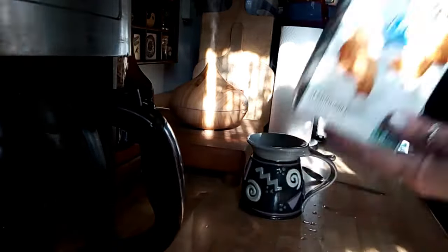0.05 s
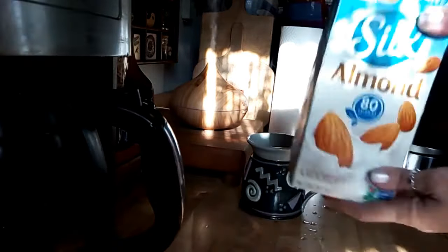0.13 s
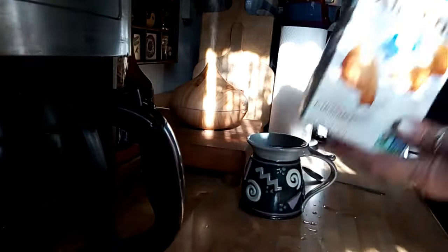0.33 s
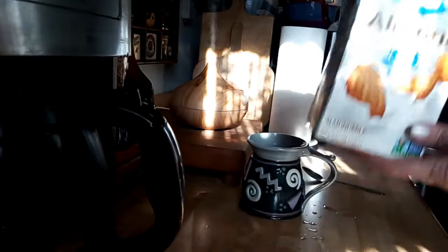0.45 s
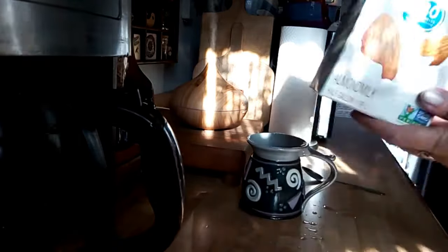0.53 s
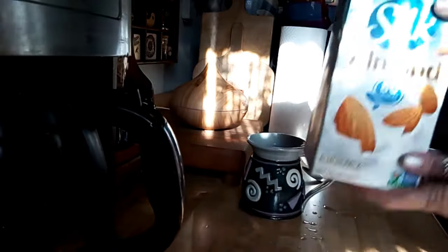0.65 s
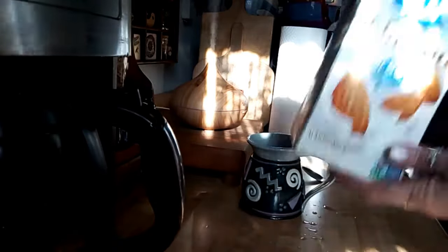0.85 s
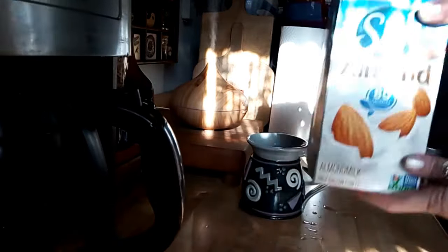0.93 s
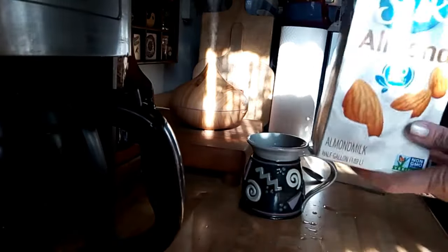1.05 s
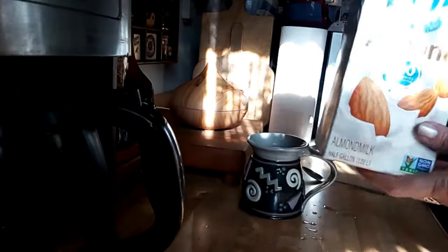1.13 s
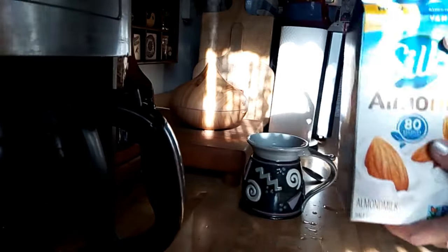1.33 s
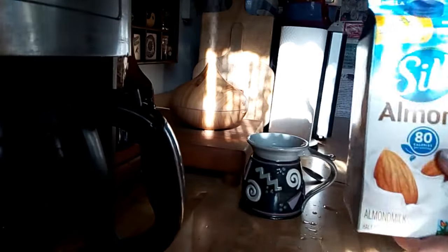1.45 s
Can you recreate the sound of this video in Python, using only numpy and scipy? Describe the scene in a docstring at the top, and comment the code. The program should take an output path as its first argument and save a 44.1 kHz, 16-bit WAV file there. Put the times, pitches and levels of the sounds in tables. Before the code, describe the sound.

A carton of milk is shaken close to the microphone: quick wet sloshes, fizzy splashes and hollow cardboard thumps for about a second, then weaker slops settling over a faint appliance hum in a quiet kitchen.

```python
"""A carton of milk is shaken by hand over a counter in a small, quiet kitchen.
First come an appliance hum (two sines) over soft coloured noise and a few drops (noise bursts).
Then the shaking: bulk milk churns and spray fizzes (banks of click-driven ringing bubbles), sounding
through the hollow carton; its walls thump and the box bulges (low damped sines).
A little later air pockets ring (damped, rising sines); at the end the milk settles over the hum."""
import sys
import numpy as np
from scipy import signal
from scipy.fft import rfft, irfft, next_fast_len
from scipy.io import wavfile

SR = 44100
rng = np.random.default_rng(int(sys.argv[2]) if len(sys.argv) > 2 else 0)


def master(y):
    """Save y as 16-bit WAV."""
    cut = np.clip(np.atleast_2d(y).T, -1, 1)
    pcm = np.round(cut * 32767)  # scale
    wavfile.write(sys.argv[1], SR, pcm.astype(np.int16))


N = 66150
TIME = np.arange(N) / SR

# appliance hum: f/Hz, rms level/dB
HUM_TONES = [(58.5, -66.5), (117, -67)]
# colour of the quiet room: f/Hz, relative level/dB
ROOM_COLOUR = [(20, -8), (40, -48), (70, -3.5), (130, -23), (175, -8.5), (290, -5), (450, -8.5),
               (700, -15.5), (1500, -23.5), (3500, -28.5), (6500, -23.5), (10000, -44.5), (13500, -43.5),
               (15300, -32.5)]
# single drops smack the cardboard: t/s, level/dB
DROP_SMACKS = [(0.036, -72), (0.048, -58), (0.1561, -50), (0.371, -37), (0.402, -41), (0.513, -35),
               (0.6332, -35), (0.871, -34), (0.898, -30.5), (0.909, -32), (1.04, -41.5), (1.208, -47.5),
               (1.324, -48.5)]
# resonances of the hollow carton: f/Hz, gain/dB
CARTON_RESONANCES = [(292, -1.5), (392, -2), (587, -7.5), (724, -13), (920, -2.5), (1308, -4), (1483, -3),
                     (1552, -2), (1812, -13), (2016, -12), (2134, -13), (2244, 1), (2357, -10)]
# the bulk of the milk rolls over: crest t/s, rise/s, level/dB, fall/(dB/s)
MILK_SURGES = [(0.233, 0.021, -39, 434), (0.336, 0.077, -47, 305), (0.377, 0.0096, -35, 250),
               (0.436, 0.062, -38, 435), (0.515, 0.029, -31.5, 320), (0.567, 0.06, -37, 171),
               (0.678, 0.06, -38, 247), (0.748, 0.049, -37, 200), (0.797, 0.064, -36.5, 315),
               (0.895, 0.026, -37.5, 335), (0.978, 0.075, -39.5, 191), (1.032, 0.042, -36, 202),
               (1.162, 0.0084, -49, 236.5), (1.238, 0.03, -48, 206), (1.257, 0.018, -50, 286),
               (1.325, 0.033, -76, 130)]
# colour of the churning: f/Hz, relative level/dB
CHURN_COLOUR = [(30, -41), (70, -38), (120, -1), (175, -17), (260, 0), (350, -2), (520, -10.5), (740, -8.5),
                (1020, -12.5), (1480, -10.5), (2200, -13.5), (4000, -22.5), (6500, -23.5), (11000, -66),
                (15500, -72)]
# milk slaps a wall and sprays: start t/s, rise/s, level/dB, fall/(dB/s)
WALL_SPLASHES = [(0.215, 0.0083, -39, 539), (0.284, 0.013, -53, 160), (0.369, 0.0087, -34.5, 397),
                 (0.392, 0.01, -33.5, 190), (0.468, 0.017, -34.5, 147), (0.629, 0.0044, -38.5, 302),
                 (0.639, 0.0038, -41, 124), (0.719, 0.018, -47, 45), (0.863, 0.0035, -45.5, 154),
                 (0.881, 0.0037, -33.5, 299), (0.903, 0.0017, -31.5, 490), (0.96, 0.045, -47, 113),
                 (1.208, .005, -53.5, 111), (1.299, 0.0083, -54.5, 193)]
# colour of the spray and drops: f/Hz, relative level/dB
SPRAY_COLOUR = [(100, -28), (300, -12), (550, -5.5), (1000, -3.5), (2200, -2), (2900, -3), (3500, -1),
                (4300, -6.5), (5300, -3.5), (6800, -1), (8000, -10.5), (10500, -26.5), (13400, -36),
                (15300, -20.5)]
# a wall of the carton takes the weight: t/s, f/Hz, peak level/dB
WALL_THUMPS = [(0.2203, 333, -30.5), (0.373, 310, -47), (0.4307, 283, -32), (0.442, 287.5, -26.5),
               (0.471, 300, -37), (0.477, 306, -26), (0.517, 297, -26), (0.53, 320, -37),
               (0.721, 333, -32.5), (0.780, 294, -38), (0.794, 295, -27), (0.8943, 276, -29),
               (0.9019, 275, -35), (1.004, 356, -28.5), (1.018, 245, -33.5), (1.240, 367, -39.5),
               (1.285, 250, -42.5), (1.325, 403, -42)]
# the whole carton bulges: t/s, peak level/dB
CARTON_BULGES = [(0.222, -44), (0.42, -44), (0.478, -35.5), (1.024, -41)]
# single air pockets ring: t/s, starting f/Hz, peak level/dB, t60/s
AIR_POCKETS = [(0.3217, 5080, -40, .015), (0.351, 3980, -50, 0.018), (0.3798, 2064, -19, 0.0089),
               (0.386, 2240, -31, .06), (0.388, 1870, -31, .05), (0.511, 752, -26.5, 0.02),
               (0.513, 1500, -41, 0.022), (0.563, 1380, -32.5, .03), (0.8875, 2170, -27.5, .025),
               (0.892, 1560, -26.5, 0.012)]

ROOM_TONE_DB = -57
DROP_RISE_S, DROP_FALL_DB_PER_S = 0.00045, 1200
CARTON_WIDTH_HZ = 7.3  # bandwidth of each resonance
KITCHEN_T60_S, KITCHEN_DB = 0.23, -12.5
# bubbles ring down by 60 dB in this many cycles
CHURN_GRAINS_PER_S, CHURN_SPREAD_DB, CHURN_CYCLES = 6000, 2, 11.9
# longer-ringing bubbles in the churn; their level is relative to the gurgle
PLINKS_PER_S, PLINK_SPREAD_DB, PLINK_CYCLES, PLINK_DB = 1400, 3.0, 41, -4.5
SPRAY_GRAINS_PER_S, SPRAY_SPREAD_DB, SPRAY_CYCLES = 8000, 2.5, 16
SNAPS_PER_S, SNAP_DB = 1600, -4.5  # droplets that strike the cardboard, relative to the fizz
THUMP_RISE_S, THUMP_T60_S = 0.0012, 0.049
BULGE_HZ, BULGE_RISE_S, BULGE_T60_S = 112.3, 0.013, 0.063
BUBBLE_RISE_S, BUBBLE_GLIDE_PER_S = 0.0011, 0.47  # glide: fractional pitch rise per second
CUTOFF_HZ = 15700


def from_db(db):
    """Decibels to gain."""
    return 10 ** (np.asarray(db) / 20)


def rms_one(x):
    """Scale to unit rms."""
    return x / np.sqrt(np.mean(x ** 2) + 1e-20)


def colour(x, spectrum):
    """Causal (minimum-phase) filter that follows a spectrum; rms 1."""
    size = 2 * next_fast_len(N)
    hz, db = np.transpose(spectrum)
    grid = np.maximum(np.arange(size // 2 + 1) * SR / size, 1)
    gain = from_db(np.interp(np.log(grid), np.log(hz), db))
    # folding the cepstrum onto positive time gives the minimum phase
    cepstrum = irfft(np.log(gain))
    cepstrum[1:size // 2] *= 2
    cepstrum[size // 2 + 1:] = 0
    response = np.exp(rfft(cepstrum))
    return rms_one(irfft(rfft(x, size) * response)[:N])


def clicks(per_s, spread_db):
    """Random clicks of uneven size and sign."""
    sizes = from_db(spread_db * np.minimum(rng.exponential(1, N), 4))
    signs = rng.choice([-1, 1], N)
    return sizes * signs * (rng.random(N) < per_s / SR)


def froth(per_s, spread_db, cycles, low_hz, high_hz, count):
    """Tiny bubbles, each a click-driven damped resonator, with even power per Hz."""
    out = np.zeros(N)
    for hz in np.geomspace(low_hz, high_hz, count):
        radius = from_db(-60 * hz / (cycles * SR))
        poles = [1, -2 * radius * np.cos(2 * np.pi * hz / SR), radius ** 2]
        drive = clicks(per_s / count, spread_db) + 1e-18
        rings = signal.lfilter([1, 0, -1], poles, drive)
        out += np.sqrt(hz) * rms_one(rings)  # offsets the geometric spacing
    return rms_one(out)


def swell(start, rise, db, fall):
    """A straight rise, then a steady fall in dB."""
    age = TIME - start
    attack = np.clip(age / rise, 0, 1)
    return attack * from_db(db - fall * np.maximum(age - rise, 0))


def ping(start, hz, db, rise, t60, glide=0):
    """A damped ring with a soft start, whose pitch may rise."""
    age = np.maximum(TIME - start, 0)
    attack = 1 - np.exp(-(age / rise) ** 2)
    shape = attack * np.exp(-np.log(1000) * age / t60)
    level = from_db(db) * shape / (shape.max() + 1e-12)
    return level * np.sin(2 * np.pi * hz * age * (1 + glide * age / 2))


def background():
    """An appliance's steady hum as sines with random phase, over soft coloured room noise."""
    hum = np.zeros(N)
    for hz, db in HUM_TONES:
        hum += np.sqrt(2) * from_db(db) * np.sin(2 * np.pi * (hz * TIME + rng.random()))
    return hum + from_db(ROOM_TONE_DB) * colour(rng.standard_normal(N), ROOM_COLOUR)


def drops():
    """Single drops smack the cardboard: very short bursts of spray-coloured noise."""
    smacks = sum(swell(t, DROP_RISE_S, db, DROP_FALL_DB_PER_S) for t, db in DROP_SMACKS)
    return smacks * colour(rng.standard_normal(N), SPRAY_COLOUR)


def hollow(x):
    """The sloshing sets the carton's air space and walls ringing, as narrow resonators."""
    radius = np.exp(-np.pi * CARTON_WIDTH_HZ / SR)
    unit_peak = (1 - radius ** 2) / 2
    out = x
    for hz, db in CARTON_RESONANCES:
        poles = [1, -2 * radius * np.cos(2 * np.pi * hz / SR), radius ** 2]
        out = out + from_db(db) * unit_peak * signal.lfilter([1, 0, -1], poles, x)
    return out


def kitchen(x):
    """A short diffuse tail from the counter and walls: decaying noise after a 3 ms gap."""
    decay = np.exp(-np.log(1000) * TIME / KITCHEN_T60_S)
    tail = rng.standard_normal(N) * decay * (TIME > .003)
    tail /= np.sqrt(np.sum(tail ** 2))
    return from_db(KITCHEN_DB) * signal.fftconvolve(x, tail)[:N]


def churn():
    """Larger bubbles tumble in each surge: short-ringing gurgle and longer plinks."""
    gurgle = froth(CHURN_GRAINS_PER_S, CHURN_SPREAD_DB, CHURN_CYCLES, 80.5, 9060, count=40)
    plinks = froth(PLINKS_PER_S, PLINK_SPREAD_DB, PLINK_CYCLES, 581, 7290, count=60)
    surges = [swell(crest - rise, rise, db, fall) for crest, rise, db, fall in MILK_SURGES]
    strength = np.sqrt(sum(surge ** 2 for surge in surges))  # overlaps add in power
    return strength * colour(gurgle + from_db(PLINK_DB) * plinks, CHURN_COLOUR)


def spray():
    """Each slap bursts into ringing fine bubbles and the bare clicks of droplets."""
    fizz = froth(SPRAY_GRAINS_PER_S, SPRAY_SPREAD_DB, SPRAY_CYCLES, 304, 15400, count=36)
    snaps = from_db(SNAP_DB) * rms_one(clicks(SNAPS_PER_S, SPRAY_SPREAD_DB))
    strength = np.sqrt(sum(swell(*row) ** 2 for row in WALL_SPLASHES))
    return strength * colour(fizz + snaps, SPRAY_COLOUR)


def wall_thumps():
    """Hollow thumps as the walls take the weight: quickly damped low rings."""
    return sum(ping(t, hz, db, THUMP_RISE_S, THUMP_T60_S) for t, hz, db in WALL_THUMPS)


def bulges():
    """The whole box flexes: a deeper damped ring with a softer start."""
    return sum(ping(t, BULGE_HZ, db, BULGE_RISE_S, BULGE_T60_S) for t, db in CARTON_BULGES)


def bubbles():
    """Trapped air pockets plink, rising slightly in pitch."""
    return sum(ping(t, hz, db, BUBBLE_RISE_S, t60, BUBBLE_GLIDE_PER_S) for t, hz, db, t60 in AIR_POCKETS)


def scene():
    """The shaken carton close by, in its room."""
    milk = drops() + churn() + spray()
    shake = hollow(milk) + wall_thumps() + bulges() + bubbles()
    return (background() + shake + kitchen(shake))[None]


def record(dry):
    """The top is cut steeply by an elliptic low-pass."""
    low_pass = signal.ellip(12, .2, 70, CUTOFF_HZ, fs=SR, output="sos")
    return signal.sosfilt(low_pass, dry)


dry = scene()
out = record(dry)
master(out)
```